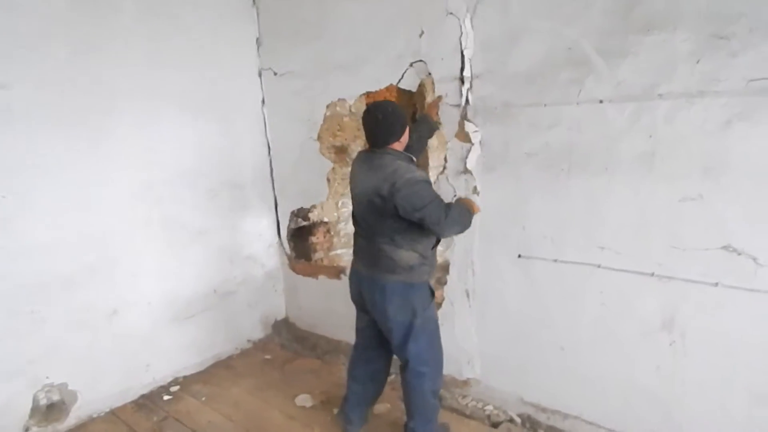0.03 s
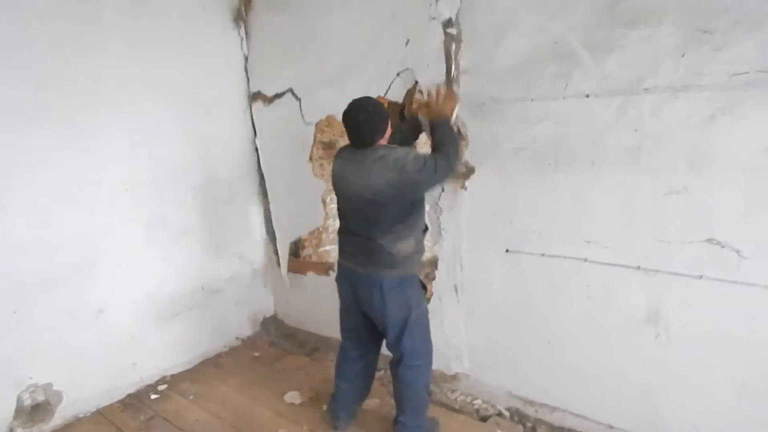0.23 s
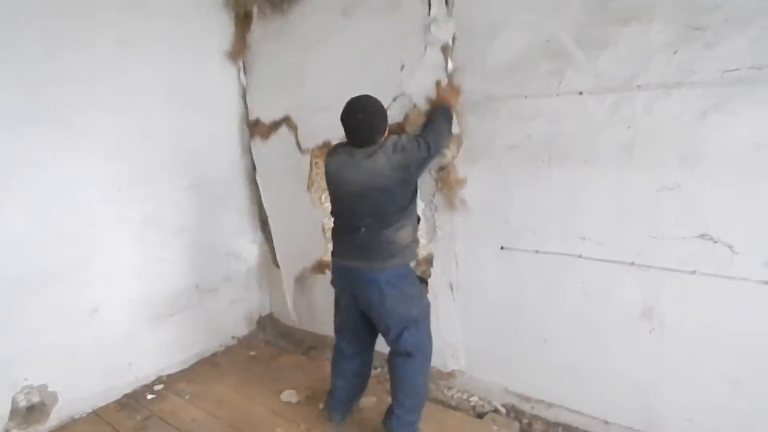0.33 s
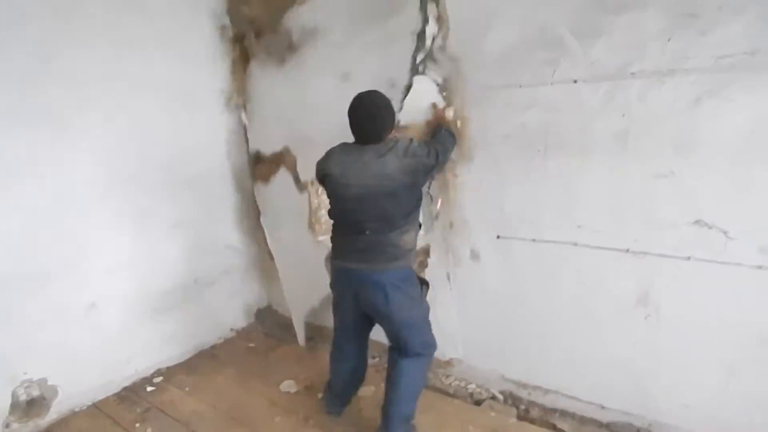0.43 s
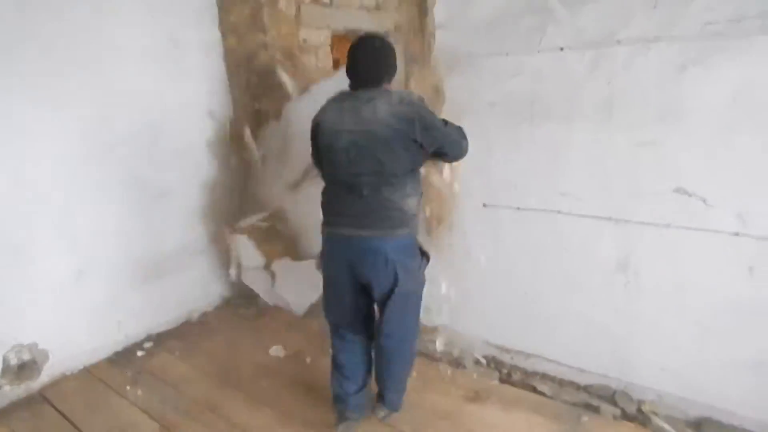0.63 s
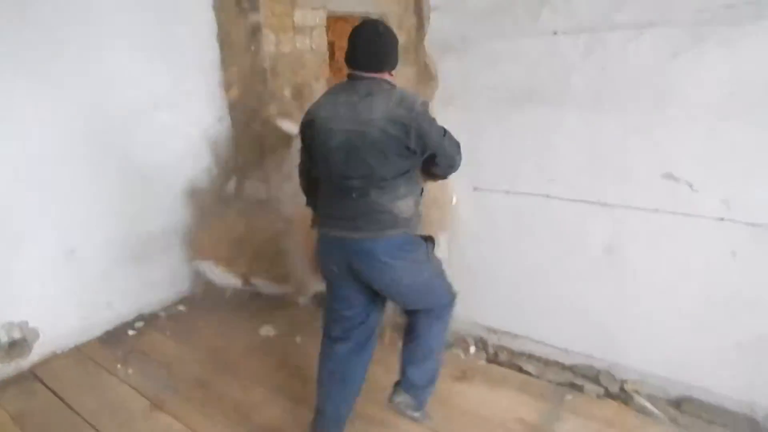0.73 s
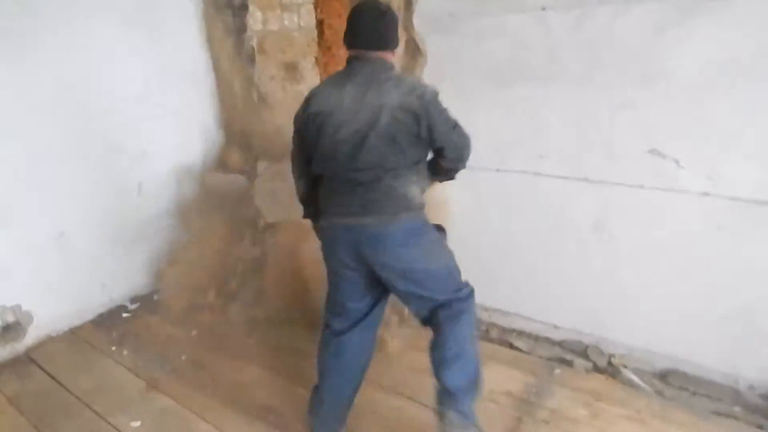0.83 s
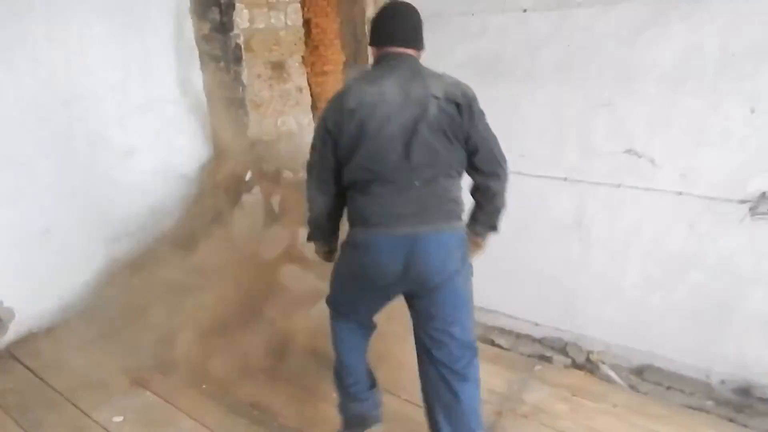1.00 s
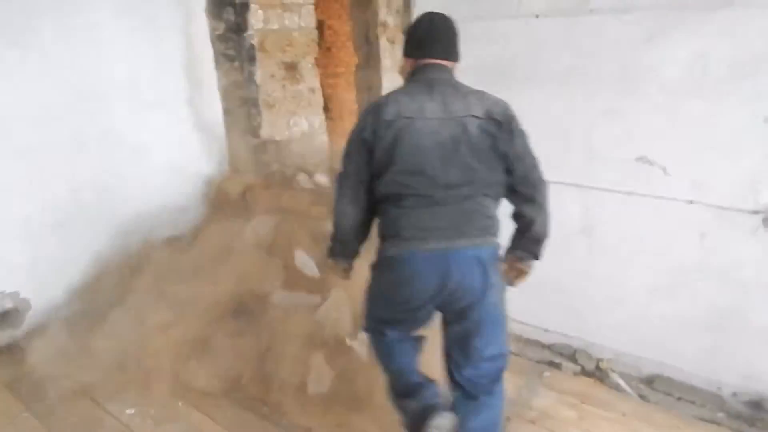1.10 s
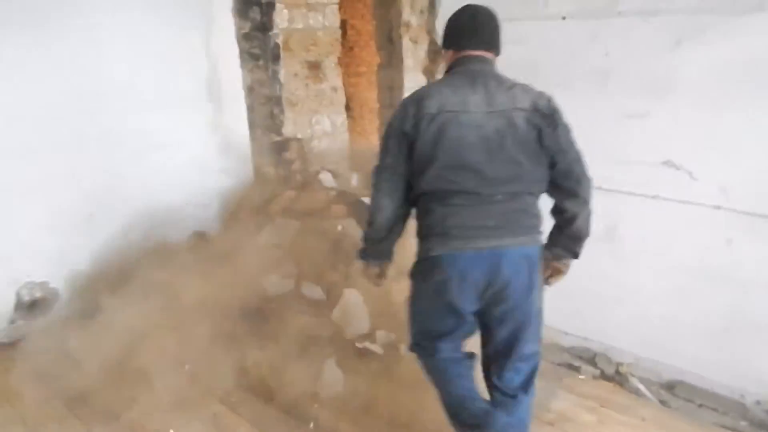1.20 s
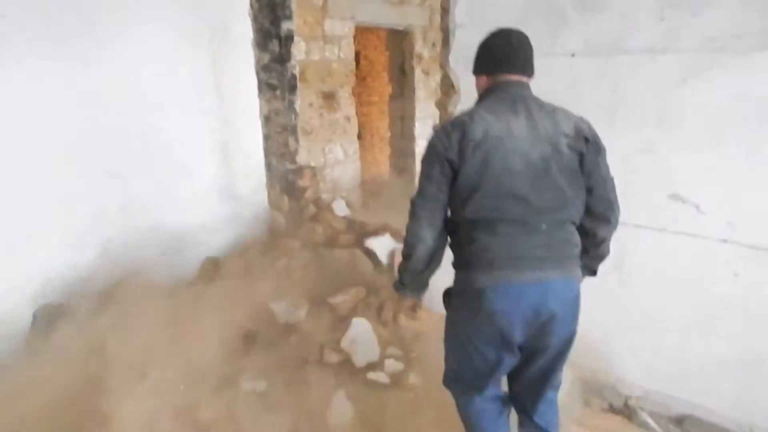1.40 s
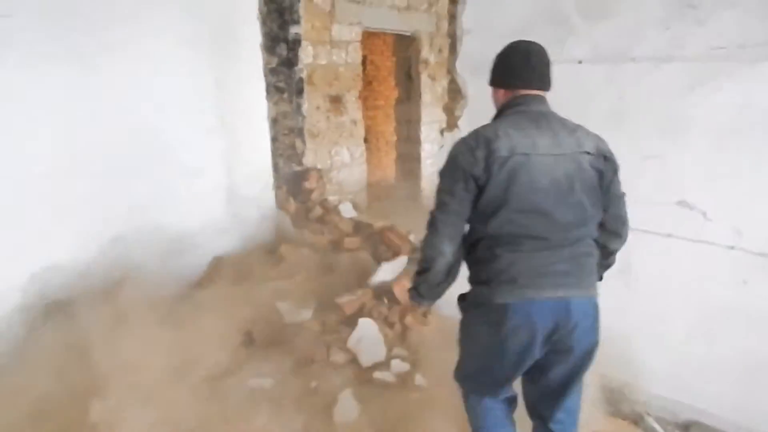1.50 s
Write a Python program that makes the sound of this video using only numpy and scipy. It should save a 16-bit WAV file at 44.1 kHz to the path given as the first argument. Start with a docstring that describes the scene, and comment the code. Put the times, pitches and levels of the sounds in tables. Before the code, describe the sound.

A wall comes crashing down onto a wooden floor, a little left of the microphone. A first rush of cracking plaster and bricks dips briefly, then a louder fall brings deep thuds and clattering chips, echoing briefly in the empty room.

```python
"""An empty room with bare walls and a board floor, heard in stereo from inside, the source a little left.
A plastered brick wall tears loose, hangs free for an instant and crashes onto the boards.
Tumbling bricks knock, the boards rumble, plaster snaps, its chips clatter and grit pours down;
the biggest lumps land as thuds. The bare walls answer every blow."""
import sys
import numpy as np
from scipy import signal
from scipy.fft import rfft, irfft, next_fast_len
from scipy.io import wavfile
from scipy.ndimage import uniform_filter1d

SR = 44100
rng = np.random.default_rng(int(sys.argv[2]) if len(sys.argv) > 2 else 0)


def to_wav(s):
    """Save 16-bit WAV."""
    ch = np.atleast_2d(s).T  # columns
    pcm = np.round(np.clip(ch, -1, 1) * 32767)  # PCM
    wavfile.write(sys.argv[1], SR, pcm.astype(np.int16))


N = 68355


# Bricks tumbling onto the floor: flow (time [s], level [dB]), colour (frequency [Hz], level [dB])
BRICK_FLOW = [(0.0, -56.5), (0.068, -46), (0.34, -20.5), (0.496, -27), (0.53, -39), (0.612, -24),
              (0.764, -22.5), (0.784, -18), (0.866, -23.5), (0.876, -18.5), (0.988, -21), (1.018, -18.5),
              (1.216, -32), (1.242, -31.5), (1.394, -41), (1.416, -34), (1.54, -40.5), (1.55, -39)]
BRICK_SPECTRUM = [(150, -30), (250, -15.5), (325, -9), (348, -3), (364, 1.5), (384, -2.5), (415, -1),
                  (490, -6.5), (570, -4.5), (660, -10.5), (850, -14), (1200, -24.5), (2200, -33),
                  (4000, -67.5)]

def bricks():
    """Bricks knock against each other in the low mids."""
    return level(BRICK_FLOW) * shower(BRICK_SPECTRUM, per_s=520, size_db=2, trail_s=.0094, trail_db=-1.5)


# The floor under the fall: shaking (time [s], level [dB]), colour (frequency [Hz], level [dB])
BOARD_SHAKE = [(0, -53.5), (.19, -35), (.3, -26), (.37, -24), (.41, -31.5), (.48, -25), (.52, -43.5),
               (.56, -39), (.594, -27), (.63, -25.5), (.71, -20.5), (.79, -23), (.86, -23), (.9, -21),
               (.93, -19), (1.04, -23), (1.11, -24), (1.35, -41), (1.39, -36), (1.445, -33.5),
               (1.55, -47.5)]
BOARD_SPECTRUM = [(45, -33.5), (70, -16), (100, -3), (143, 1.5), (175, -2), (230, -7), (290, -17),
                  (420, -53.5)]

def boards():
    """The boards rumble, shaken by the falling mass."""
    return level(BOARD_SHAKE) * shower(BOARD_SPECTRUM, per_s=180, size_db=5, trail_s=.0075, trail_db=1)


# Heavy lumps hitting the floor (time [s], knock level [dB], boom level [dB])
LANDINGS = [(0.307, -24.5, -47), (0.343, -24, -24.5), (.584, -34.5, -21.5), (0.7, -34, -30),
            (.777, -25, -41), (0.876, -33, -42), (.920, -22.5, -21.5), (0.997, -22, -15.5),
            (1.028, -23, -24), (1.108, -27.5, -20), (1.243, -26.5, -38), (1.408, -37, -35)]
# The knock and the boards' boom (frequency [Hz], level [dB], t60 [s])
KNOCK_RING = [(359.8, 2.5, 0.225), (411, 5.5, 0.12), (464, 1, 0.16), (565, -7, 0.053)]
BOOM_RING = [(99, -10, 0.11), (142.9, 5, 0.17), (206.3, -18, 0.21)]

def thuds(attack_s=.0017, bass_hz=48):
    """Each heavy lump knocks and sets the boards booming; they radiate little below bass_hz."""
    out, t = np.zeros(N), np.arange(SR // 2) / SR
    onset = (1 - np.exp(-t / attack_s)) ** 2
    for s, knock_db, boom_db in LANDINGS:
        add(out, s, onset * (amp(knock_db) * ring(KNOCK_RING, t) + amp(boom_db) * ring(BOOM_RING, t)))
    return signal.sosfilt(signal.butter(2, bass_hz, 'highpass', fs=SR, output='sos'), out)


# Plaster giving way (time [s], level [dB], pitch [Hz], t60 [s])
SNAPS = [(.156, -36, 3500, 0.034), (.239, -31.5, 3230, 0.12), (.322, -34.5, 8000, 0.039),
         (.404, -34, 10000, 0.022), (0.502, -24, 6650, 0.028), (0.516, -25, 7300, 0.027),
         (.666, -29, 3250, 0.048), (.758, -27.5, 1450, 0.13), (.775, -27.5, 1370, 0.026),
         (0.937, -28.5, 3060, 0.028), (1.021, -24, 1260, 0.14), (1.028, -21, 2730, 0.023)]

def cracks(attack_s=.00059, octaves_below=1.2, octaves_above=.35):
    """Plaster breaks in short dry bursts, lower for bigger pieces."""
    out, t = np.zeros((2, N)), np.arange(SR // 6) / SR
    for s, db, pitch_hz, t60 in SNAPS:
        def band(hz):
            width = np.where(hz < pitch_hz, octaves_below, octaves_above)
            return np.exp(-.5 * (np.log2((hz + 1) / pitch_hz) / width) ** 2)
        burst = unit(spread(filtered(rng.standard_normal((2, len(t))), band)))
        add(out, s, amp(db - 60 * t / t60) * (1 - np.exp(-t / attack_s)) * burst)
    return out


# Plaster chips coming down: flow (time [s], level [dB]), colour (frequency [Hz], level [dB])
CHIP_FLOW = [(0, -51.5), (.22, -43), (.358, -35.5), (.418, -40), (.504, -32.5), (.53, -39.5), (.642, -38),
             (.69, -29.5), (.742, -31.5), (.784, -23), (.798, -37), (.854, -39), (.925, -32.5), (.98, -35),
             (1.016, -35), (1.092, -37), (1.42, -53.5), (1.55, -52)]
CHIP_SPECTRUM = [(500, -19.5), (900, 1), (1150, 2.5), (1700, -2), (2300, -7.5), (3300, -12), (4500, -19.5),
                 (7000, -32), (12000, -51)]

def chips():
    """Chips clatter, each a short spray of crumbs."""
    return level(CHIP_FLOW) * shower(CHIP_SPECTRUM, per_s=350, size_db=0, trail_s=.0049, trail_db=10)


# Grit and sand, wide in the image: flow (time [s], level [dB]), colour (frequency [Hz], level [dB])
GRIT_FLOW = [(0.0, -53), (0.09, -47.5), (0.31, -41), (0.328, -37.5), (0.384, -40.5), (0.404, -37.5),
             (0.422, -40), (0.504, -33.5), (0.538, -41), (0.78, -39), (0.798, -45.5), (0.932, -46),
             (0.98, -53), (1.186, -60.5), (1.514, -61.5), (1.55, -53.5)]
GRIT_SPECTRUM = [(1200, -2.5), (2500, 3), (4000, 0.5), (5200, 1.5), (7000, 0), (8300, 0.5), (10200, 3),
                 (12500, -0.5), (14000, -8), (15800, -12)]

def grit():
    """Pouring grains tick so densely that they hiss."""
    return level(GRIT_FLOW) * shower(GRIT_SPECTRUM, per_s=1800, size_db=4, trail_s=.012, trail_db=2)


# Low end at the microphones: swell (time [s], level [dB]), colour (frequency [Hz], level [dB])
BASS_SWELL = [(0, -64), (.21, -44.5), (.29, -34), (.44, -42), (.505, -49), (.555, -55), (.6, -27),
              (.66, -34.5), (.73, -44), (.82, -52), (.86, -39), (.897, -41), (.94, -36), (1.03, -64),
              (1.2, -65), (1.28, -43), (1.35, -75), (1.46, -67), (1.55, -56)]
BASS_SPECTRUM = [(12, -56), (25, -0.5), (42, -29), (62, 6.5), (75, 14), (110, -33)]

def deep_bass():
    """The heaviest pieces put a deep shudder under the fall."""
    return level(BASS_SWELL) * shower(BASS_SPECTRUM, per_s=420, size_db=-3, trail_s=.017, trail_db=.5)


# Decay between the bare walls (frequency [Hz], t60 [s])
ROOM_DECAY = [(120, 0.42), (500, 0.48), (2000, .45), (10000, 0.12)]

def room(x):
    """The tail of the bare room, shorter in the treble."""
    hz, t, noise = signal.stft(rng.standard_normal((2, SR * 3 // 4)), SR, nperseg=256)
    decay = amp(-60 * t / along(ROOM_DECAY, hz)[:, None])
    tail = spread(signal.istft(noise * decay, SR, nperseg=256)[1])
    return signal.fftconvolve(x, tail / np.linalg.norm(tail[0]), axes=1)[:, :N]


# Likeness of the left and right microphones (frequency [Hz], correlation [-1 to 1])
MIC_LIKENESS = [(60, 0.99), (250, 0.98), (600, 0.93), (1200, 0.8), (2500, 0.36), (5000, -0.13),
                (9000, 0.22), (13000, -0.23)]

def spread(pair):
    """Two unrelated signals become left and right: alike in the bass, apart in the treble."""
    def weights(hz):
        turn = np.arccos(along(MIC_LIKENESS, hz)) / 2
        return np.array([np.cos(turn), np.sin(turn)])
    mid, side = filtered(pair, weights)
    return np.array([mid + side, mid - side])


def shower(colour, per_s, size_db, trail_s, trail_db, steady_s=.03):
    """An even flow of random impacts, each trailed by its crumbs and near reflections; stereo, rms 1."""
    hits = (rng.random((2, N)) < per_s / SR) * rng.choice([-1, 1], (2, N))
    hits = hits * amp(size_db * np.clip(rng.standard_normal((2, N)), -2, 2))
    fall = np.exp(-1 / (trail_s * SR))
    energy = signal.lfilter([1 - fall], [1, -fall], np.mean(hits ** 2, axis=0))
    crumbs = np.sqrt(np.abs(energy)) * rng.standard_normal((2, N))
    flow = unit(spread(coloured(hits + amp(trail_db) * crumbs, colour)))
    span = round(steady_s * SR)
    power = uniform_filter1d(uniform_filter1d(np.mean(flow ** 2, axis=0), span), span)
    return unit(flow / np.sqrt(np.abs(power) + .05))


def ring(modes, t):
    """Decaying modes, a little different in level and pitch at each blow."""
    out = np.zeros(len(t))
    for hz, db, t60 in modes:
        decay = amp(db + rng.normal(0, .76) - 60 * t / t60)
        out += decay * np.sin(2 * np.pi * hz * (1 + rng.normal(0, .018)) * t)
    return out


def coloured(x, colour):
    """x through a causal filter of the given colour."""
    def response(hz):
        cepstrum = irfft(np.log(amp(along(colour, hz))))
        half = len(cepstrum) // 2
        return np.exp(rfft(np.r_[cepstrum[0], 2 * cepstrum[1:half], np.zeros(half)]))
    return filtered(x, response)


def filtered(x, response):
    """x times a response of frequency."""
    n = x.shape[-1]
    padded = next_fast_len(n + 8192)
    return irfft(rfft(x, padded) * response(np.fft.rfftfreq(padded, 1 / SR)), padded)[..., :n]


def amp(db):
    """Decibels to gain."""
    return 10 ** (np.asarray(db) / 20)


def unit(x):
    """Scaled to rms 1."""
    return x / np.sqrt(np.mean(x ** 2) + 1e-20)


def along(points, hz):
    """(Hz, value) points read on a log axis."""
    freqs, values = np.transpose(points)
    return np.interp(np.log(hz + 1), np.log(freqs + 1), values)


def level(rows):
    """Gain per sample from (s, dB) rows."""
    return amp(np.interp(np.arange(N) / SR, *np.transpose(rows)))


def add(track, s, sound):
    """Mix a sound in at time s."""
    part = track[..., max(0, round(s * SR)):][..., :sound.shape[-1]]
    part += sound[..., :part.shape[-1]]


# The wall stands left of the microphones (frequency [Hz], left over right [dB])
LEFT_BIAS = [(40, 0.7), (200, 2.5), (1000, 2.5), (5000, 1.6), (12000, 1.2)]

def scene():
    """The collapse, a little to the left, and the room's answer."""
    rubble = amp(-3.5) * deep_bass() + amp(-3) * boards() + amp(-1.4) * bricks()
    rubble += chips() + amp(2.5) * grit()
    blows = thuds() + cracks()
    sound = rubble + blows + room(amp(-16.5) * rubble + amp(-10.5) * blows)
    return filtered(sound, lambda hz: amp(np.outer([.5, -.5], along(LEFT_BIAS, hz))))


TOP_HZ = 15800

def record(dry):
    """Nothing is kept above the band limit."""
    return filtered(dry, lambda hz: hz < TOP_HZ)


dry = scene()
out = record(dry)
to_wav(out)
```